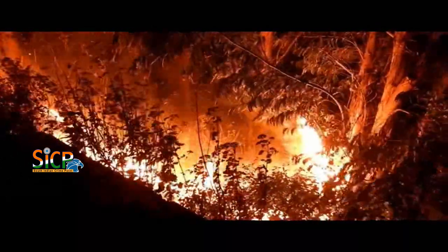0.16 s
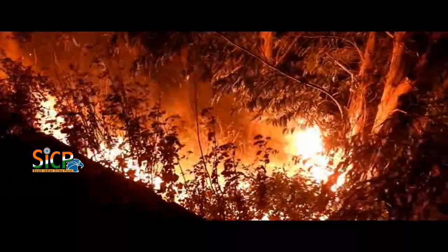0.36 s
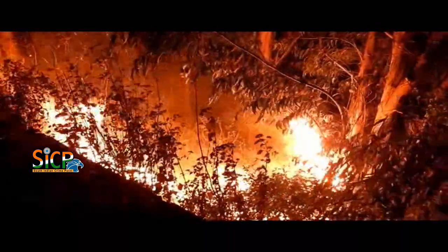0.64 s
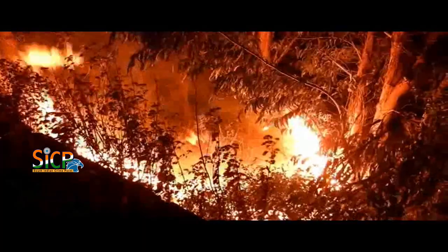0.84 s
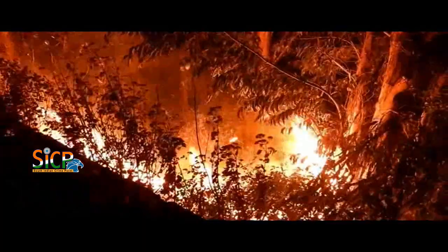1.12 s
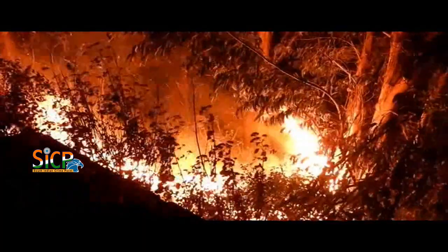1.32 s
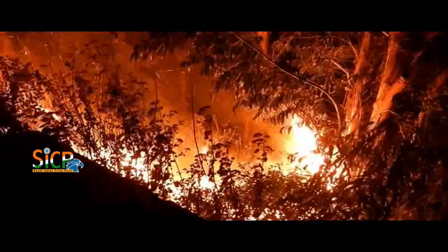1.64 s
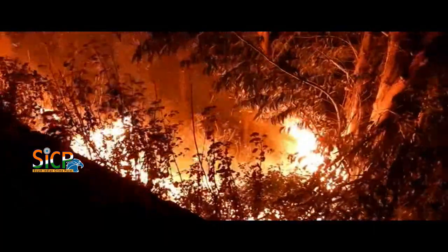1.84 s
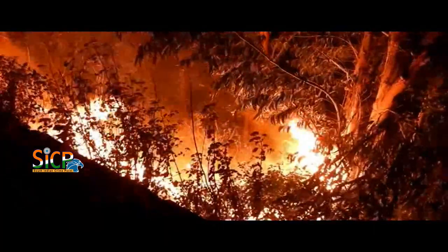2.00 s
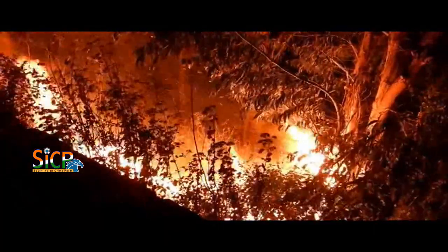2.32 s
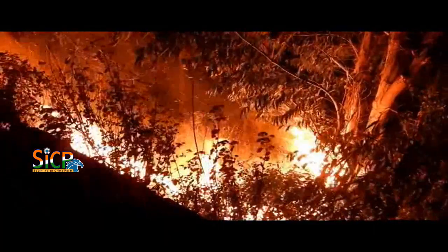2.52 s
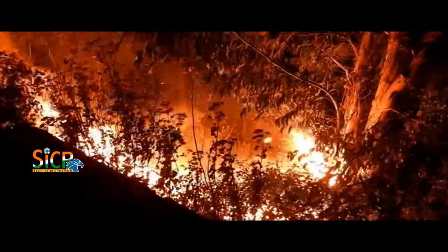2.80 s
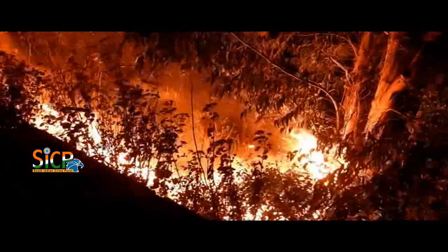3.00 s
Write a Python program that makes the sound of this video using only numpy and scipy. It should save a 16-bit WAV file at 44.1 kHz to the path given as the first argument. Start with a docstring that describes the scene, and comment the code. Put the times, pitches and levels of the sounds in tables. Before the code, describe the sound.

Dense, bright wildfire crackle in stereo, surging as clumps of leaves catch, with dry snaps and hard wood pops; underneath, low rumbling air and gusts knock the microphone, strongest in the first second or so.

```python
"""Countless leaves and twigs sizzle and crackle in a wildfire, and now and then wood bursts with a sharp pop.
Shaped noise makes the sizzle, random clicks the crackle, and short noisy cracks through resonances the pops.
Decaying noise scatters the snaps among undergrowth and trunks. Low noise is the draught, which rumbles
and buffets the microphone; gliding noise bands are tongues of flame. The recorder's treble lags slightly."""
import sys
import numpy as np
from scipy import signal
from scipy.fft import rfft, irfft
from scipy.io import wavfile
from scipy.ndimage import uniform_filter1d

SR = 44100
rng = np.random.default_rng(int(sys.argv[2]) if len(sys.argv) > 2 else 0)


def store_wav(level_fs):
    """Save 16-bit WAV to argv[1]."""
    pcm = np.round(np.clip(np.atleast_2d(level_fs), -1, 1) * 32767)
    wavfile.write(sys.argv[1], SR, pcm.T.astype(np.int16))


N = 138915
TIME = np.arange(N) / SR

# strength of the fire's draught: t/s, level/dB before each layer's trim
DRAUGHT_LEVEL = [(0, -12.5), (.06, -22), (.5, -20), (.8, -23.5), (1.28, -20.5), (1.87, -23), (1.94, -25),
                 (2.22, -22.5), (2.55, -25), (2.9, -18), (3.14, -25)]
# treble colour of snapping wood and leaves: f/Hz, level/dB before scaling to unit energy
SNAP_SPECTRUM = [(300, -42), (1200, -15), (3500, -16.5), (5000, -1), (7000, -3.5), (9000, 3.5), (10500, -8),
                 (12500, -31), (16000, -76)]

# positive pans lean left, negative pans lean right
AIR_PAN_DB, SNAP_PAN_DB = -11.5, 3.5
EDDY_S = 0.0063  # time scale of the small eddies


def amp(db):
    """Turns decibels into a linear gain."""
    return 10 ** (np.asarray(db) / 20)


def evened(x):
    """Scales to unit rms."""
    return x / np.sqrt(np.mean(x ** 2) + 1e-20)


def read(points, hz):
    """Reads a spectrum on a log-frequency axis."""
    f, value = np.transpose(points)
    return np.interp(np.log(hz + 1), np.log(f + 1), value)


def level(curve):
    """Gain over time from a (s, dB) curve."""
    return amp(np.interp(TIME, *np.transpose(curve)))


def swell(s, width):
    """A smooth rise and fall around time s."""
    return np.exp(-.5 * ((TIME - s) / width) ** 2)


def pan(db):
    """Left and right gains of constant power; db is left against right."""
    return evened(amp(np.array([[db], [-db]]) / 2))


def add(mix, s, sound):
    """Mixes a sound in at time s."""
    part = mix[:, round(s * SR):][:, :sound.shape[-1]]
    part += sound[..., :part.shape[1]]


def causal(gain_db, size=2048):
    """The sharpest (minimum-phase) click that has this spectrum, with unit energy."""
    mirrored = np.r_[gain_db, gain_db[-2:0:-1]]
    log_gain = mirrored * np.log(10) / 20
    minimum_phase = np.exp(np.conj(signal.hilbert(log_gain)))
    click = np.fft.ifft(minimum_phase).real[:size // 2]
    return click / np.linalg.norm(click)


def wobble(seconds):
    """Smooth random motion of unit rms, drawn apart for each channel."""
    hz = np.fft.rfftfreq(N, 1 / SR)
    lowpass = np.exp(-(hz * seconds) ** 2)
    return evened(irfft(rfft(rng.standard_normal((2, N))) * lowpass, N))


def steadied(x, size=1500):
    """Takes the slow chance swings out of a noise and keeps its fast grain."""
    power = uniform_filter1d(uniform_filter1d((x ** 2).mean(0), size), size)
    return x / np.sqrt(abs(power) + 1e-12)


def noise(spectrum, likeness, patch_db, size):
    """Stereo noise of a given colour, with patches that drift in time and frequency."""
    hz = np.fft.rfftfreq(size, 1 / SR)
    hop = size // 4
    a, b, c, d, patches = rng.standard_normal((N // hop + 5, len(hz), 5)).T
    patches = uniform_filter1d(patches, size=7, axis=0)
    patches = evened(uniform_filter1d(patches, size=8, axis=1))
    same = 0 if likeness is None else np.clip(read(likeness, hz), -1, 1)[:, None]
    left = a + 1j * b
    right = same * left + np.sqrt(1 - same ** 2) * (c + 1j * d)
    gain = amp(read(spectrum, hz)[:, None] + patch_db * patches)
    sound = signal.istft(np.array([left, right]) * gain, nperseg=size, noverlap=size - hop)[1]
    return evened(sound[:, :N])


def forest(x):
    """Adds quick scatter from the undergrowth and a thin tail from the trunks, as decaying noise."""
    t = TIME[:SR // 2]
    undergrowth = (-6.5, 0.02, .6)  # level/dB, time to fall 60 dB/s, share unlike on the two sides
    trunks = (-5.5, 0.053, .7)
    out = x.copy()
    for db, t60, apart in (undergrowth, trunks):
        tail = rng.standard_normal(len(t)) + apart * rng.standard_normal((2, len(t)))
        tail = tail * amp(-60 * t / t60) * (t > .0007)
        tail /= np.linalg.norm(tail[0])
        out += amp(db) * signal.fftconvolve(x, tail, axes=1)[:, :x.shape[1]]
    return out


def rumble():
    """The draught rumbles in uneven puffs, its noise unrelated on the two sides."""
    # colour of the rumble: f/Hz, level/dB before scaling to unit rms
    rumble_spectrum = [(30, -16), (60, -5.5), (95, 1), (180, -0.5), (250, -13), (400, -21.5), (700, -38),
                       (1200, -45.5), (3000, -72)]
    trim_db, pan_db, patch_db = 4.5, -3.5, 2.5
    buffet_db, buffet_s = 3.5, 0.018
    air = noise(rumble_spectrum, None, patch_db, size=2048)
    air = steadied(air * amp(buffet_db * wobble(buffet_s)[0]), size=5000)
    return amp(trim_db) * level(DRAUGHT_LEVEL) * pan(pan_db) * air


def gusts():
    """Each gust is a low push on both sides and a brighter flutter of eddies, mostly right, that never quite stops."""
    # gusts breaking up on the microphone: peak t/s, half width/s, push level/dB, flutter level/dB before trim
    gust_events = [(0.14, 0.031, -12, -26), (0.362, 0.036, -15.5, -23.5), (.53, 0.036, -23.5, -33.5),
                   (0.65, 0.022, -13.5, -53), (0.875, 0.034, -20.5, -26), (1.04, 0.0042, -8.5, -25),
                   (1.16, 0.057, -17.5, -20.5), (1.227, 0.014, -14.5, -23), (1.606, 0.036, -19.5, -28.5),
                   (1.779, 0.058, -26.5, -31.5), (2.347, 0.0084, -18, -31), (2.72, 0.016, -21, -48),
                   (2.869, 0.04, -15, -34), (3.092, 0.077, -14, -27.5)]
    # colour of the push: f/Hz, level/dB before levelling
    push_spectrum = [(40, -8), (100, 1), (180, -3), (300, -11), (500, -33.5), (1000, -70), (3000, -73)]
    # colour of the flutter: f/Hz, level/dB before levelling
    flutter_spectrum = [(100, -12.5), (300, 5), (500, 3.5), (800, -10), (1150, -29.5), (1700, -28.5),
                        (4000, -55)]
    patch_db, flutter_pan_db, eddy_db = 4.5, -7, 7
    flutter_trim_db = -1
    steady_flutter_db = -15  # between the gusts, against the draught
    push = steadied(noise(push_spectrum, None, patch_db, size=1024), size=900)
    flutter = noise(flutter_spectrum, None, patch_db, size=512)
    flutter = steadied(flutter * amp(eddy_db * wobble(EDDY_S)), size=1500)
    flutter = pan(flutter_pan_db) * flutter
    out = amp(steady_flutter_db) * level(DRAUGHT_LEVEL) * flutter
    for s, width, push_db, flutter_db in gust_events:
        gust = amp(push_db) * push + amp(flutter_db + flutter_trim_db) * flutter
        out += swell(s, width) * gust
    return out


def knocks():
    """A single eddy hits the microphone: a damped low push with a ragged wake, brighter the smaller the eddy."""
    # single eddies: t/s, peak level/dB before panning, top of the spectrum f/Hz
    knock_events = [(0.2031, -5.5, 780), (.211, -3, 304), (1.101, -5.5, 376), (2.068, -6.5, 170),
                    (2.155, -7.5, 540)]
    centre_hz, width_hz = 125, 210
    wake_db = -24.5  # ragged air behind each knock
    out = np.zeros((2, N))
    hz = np.fft.rfftfreq(4096, 1 / SR) + 1
    for s, db, top_hz in knock_events:
        detuning = (hz ** 2 - centre_hz ** 2) / (hz * width_hz)
        loss = (1 + detuning ** 2) * (1 + (hz / top_hz) ** 8)
        push = causal(np.maximum(-10 * np.log10(loss), -100), size=4096)
        t = TIME[:len(push)]
        wake = amp(wake_db) * rng.standard_normal(len(t)) * np.exp(-t / EDDY_S)
        push = signal.fftconvolve((t == 0) + wake, push)
        add(out, s, pan(AIR_PAN_DB) * amp(db) * push / abs(push).max())
    return out


def whooshes():
    """A tongue of flame roars in one broad, gliding resonance."""
    # tongues of flame: peak t/s, half width/s, level/dB, pitch at the peak f/Hz, glide/(Hz per s)
    flame_tongues = [(.35, 0.014, -36, 940, -2000), (.868, 0.011, -34, 665, 5000),
                     (1.18, 0.037, -30.5, 830, -1800)]
    width_hz = 320
    out = np.zeros((2, N))
    band = signal.butter(2, width_hz / 2, fs=SR, output="sos")
    for s, width, db, hz, glide in flame_tongues:
        # shift the noise down, low-pass it, and shift it back up around the gliding pitch
        turn = np.exp(2j * np.pi * np.cumsum(hz + glide * (TIME - s)) / SR)
        roar = (turn * signal.sosfilt(band, rng.standard_normal((2, N)) / turn)).real
        out += amp(db) * swell(s, width) * steadied(pan(AIR_PAN_DB) * roar)
    return out


def crackle(kinds=24):
    """Twigs and leaves snap at random: many faint, a few strong, each kind with its own colour and place."""
    # average colour of the clicks: f/Hz, level/dB before scaling to unit energy
    crackle_spectrum = [(400, -43), (1200, -5.5), (1900, -7), (2450, -4), (3500, -7.5), (5000, -2),
                        (7000, -2.5), (9000, 0), (10500, -18), (12500, -50), (16000, -56)]
    trim_db, clicks_per_s, pan_spread_db = -1, 900, 7.5
    spread_db, strength_cap, colour_db = 8.5, 3.14, 8
    out = np.zeros((2, N))
    hz = np.fft.rfftfreq(2048, 1 / SR)
    for _ in range(kinds):
        chance = rng.random(N)
        strength = np.minimum(rng.exponential(1, N), strength_cap)
        clicks = (chance < clicks_per_s / kinds / SR) * amp(spread_db * strength)
        colour = evened(uniform_filter1d(rng.standard_normal(len(hz)), size=50))
        click = causal(read(crackle_spectrum, hz) + colour_db * colour)
        place = pan(pan_spread_db * rng.standard_normal())
        click = forest(place * np.pad(click, (0, SR // 10)))
        out += signal.oaconvolve(clicks[None], click, axes=1)[:, :N]
    return amp(trim_db) * evened(out)


def foliage():
    """Near crackles over the fused sizzle of the fire front; both surge when a clump of leaves catches."""
    # level of sizzle and crackle: t/s, level/dB before their trims;
    # at 0.2 s a wind buffet overloads the microphone and chokes them
    foliage_level = [(0, -33), (.09, -36), (.203, -50), (.225, -34.5), (.32, -43), (.45, -36.5),
                     (.6, -38.5), (1.02, -40.5), (1.2, -36.5), (1.275, -45.5), (1.4, -38.5), (1.52, -44),
                     (1.62, -40), (2.49, -40), (2.65, -37.5), (3.14, -35)]
    # clumps of leaves flaring up: peak t/s, half width/s, level/dB before the same trims
    flare_events = [(.148, 0.031, -31), (0.367, 0.015, -36.5), (.44, 0.058, -37.5), (.7, 0.049, -39.5),
                    (0.864, 0.044, -37.5), (1.171, 0.0088, -30.5), (1.595, 0.012, -34),
                    (1.84, 0.025, -43.5), (2.122, 0.012, -36.5), (2.308, 0.02, -39.5),
                    (2.594, 0.027, -31.5), (2.717, 0.014, -31.5), (2.96, 0.066, -47), (3.1, 0.054, -49)]
    # colour of the sizzle: f/Hz, level/dB before scaling to unit rms
    sizzle_spectrum = [(500, -46), (1200, -16.5), (1900, -9), (2450, -11), (3600, -11.5), (4700, -9.5),
                       (7500, -5), (8800, 1.5), (9600, -2), (10800, -12), (14000, -29.5), (16000, -62)]
    # likeness of the two sides: f/Hz, left-right correlation/1
    side_likeness = [(500, 1), (2000, 0.6), (4000, 0.76), (7000, 0.57), (10000, 0.26), (15000, .1)]
    sizzle_db, patch_db, pan_db = 2.1, 3.5, 0.5
    flare_power = sum((amp(db) * swell(s, width)) ** 2 for s, width, db in flare_events)
    gain = np.sqrt(level(foliage_level) ** 2 + flare_power)
    sizzle = amp(sizzle_db) * noise(sizzle_spectrum, side_likeness, patch_db, size=256)
    return gain * pan(pan_db) * (sizzle + crackle())


def leaves():
    """Dry leaves close by burst with a thin snap and no ring of wood."""
    # dry leaves snapping: t/s, level/dB of the tearing noise at its start, before colour and scatter
    leaf_events = [(.181, -20), (.818, -22.5), (1.152, -24), (2.397, -26), (2.752, -23), (2.9327, -17)]
    tear_s = 0.0017
    out, t = np.zeros((2, N)), TIME[:SR // 5]
    snap = causal(read(SNAP_SPECTRUM, np.fft.rfftfreq(2048, 1 / SR)))
    for s, db in leaf_events:
        tear = rng.standard_normal(len(t)) * np.exp(-t / tear_s)
        crack = signal.fftconvolve(tear, snap)[:len(t)]
        add(out, s, forest(pan(SNAP_PAN_DB) * amp(db) * crack))
    return out


def pops():
    """Each pop is one crack and a short spray of splinters, ringing in the wood and snapping in the treble."""
    # bursting wood: t/s, body level/dB, snap level/dB before trim, body pitch f/Hz, splitting time/s
    wood_bursts = [(0.0574, -26.5, -35, 2400, 0.0035), (0.0949, -13.5, -9, 2330, 0.0012),
                   (0.2195, -28, -21, 2140, 0.0037), (.353, -24.5, -16, 1400, 0.002),
                   (0.3623, -16, -38, 2600, 0.00049), (0.4108, -8, -16, 2140, 0.00018),
                   (0.667, -17.5, -14.5, 2340, 0.0011), (0.73, -18, -12, 2340, 0.0017),
                   (0.903, -26, -10.5, 2480, 0.00057), (1.0912, -24.5, -15.5, 3100, 0.0012),
                   (1.3403, -20, -9, 1450, 0.0012), (1.6014, -22, -36, 2410, 0.00063),
                   (1.825, -22.5, -19, 2410, 0.00039), (2.4065, -28, -18, 1620, 0.0014),
                   (2.456, -33, -16.5, 2190, 0.00074), (2.5, -22, -29, 2350, 0.001),
                   (2.5048, -27.5, -18, 2560, 0.0019), (2.5724, -21.5, -7, 2660, 0.00039),
                   (2.699, -27.5, -17.5, 2230, 0.0011), (2.8139, -20.5, -28, 2280, 0.00044),
                   (2.8979, -22, -14, 2480, 0.0041), (2.9844, -19.5, -16.5, 2520, 0.0054),
                   (2.9836, -14, -4, 980, 0.0015)]
    # thin twigs cracking: t/s, level/dB of body and of snap before trim
    twig_cracks = [(.8835, -33), (1.9208, -24.5), (2.216, -31), (2.862, -22.5), (3.0532, -25.5),
                   (3.1326, -28.5)]
    twig_hz, twig_split_s = 2600, 0.00079  # all twigs are of one size
    body_width_hz, body_low_hz, body_high_hz = 1090, 830, 5930  # the ring carries only from low to high
    body_pan_db, snap_trim_db = -3, -4.5
    body_spray_db, snap_spray_db = -11, 2  # splinters against the first crack
    out, t = np.zeros((2, N)), TIME[:SR // 5]
    hz = np.fft.rfftfreq(2048, 1 / SR)
    snap = causal(read(SNAP_SPECTRUM, hz))
    rolloff = 1 + (body_low_hz / (hz + 1)) ** 6 + (hz / body_high_hz) ** 8
    twigs = [(s, db, db, twig_hz, twig_split_s) for s, db in twig_cracks]
    for s, body_db, snap_db, pitch, split_s in list(wood_bursts) + twigs:
        detuning = (hz ** 2 - pitch ** 2) / ((hz + 1) * body_width_hz)
        body = causal(np.maximum(-10 * np.log10((1 + detuning ** 2) * rolloff), -100))
        layers = ((body, body_db, body_spray_db, body_pan_db),
                  (snap, snap_db + snap_trim_db, snap_spray_db, SNAP_PAN_DB))
        sound = np.zeros((2, len(t)))
        for ring, db, spray_db, side_db in layers:
            spray = rng.standard_normal(len(t)) * np.exp(-t / split_s) / np.sqrt(SR / 2000)
            crack = signal.fftconvolve((t == 0) + amp(spray_db) * spray, ring)[:len(t)]
            # slower splitting carries more energy
            crack = crack / np.linalg.norm(crack) * np.sqrt(split_s * SR / 2)
            sound += pan(side_db) * amp(db) * crack
        add(out, s, forest(sound))
    return out


def scene():
    """The fire, reaching the left side a little earlier, and the moving air."""
    right_lag_s = .000007
    fire = foliage() + pops() + leaves()
    hz = np.fft.rfftfreq(N, 1 / SR)
    fire[1] = irfft(rfft(fire[1]) * np.exp(-2j * np.pi * hz * right_lag_s), N)
    return fire + whooshes() + rumble() + gusts() + knocks()


def record(dry):
    """A low cut; the treble comes out a little later than the rest; then full-scale clipping and the band limit."""
    low_cut_hz, split_hz, edge_hz = 58, 4100, 15700
    treble_lag_s = .0106
    x = signal.sosfilt(signal.butter(2, low_cut_hz, "high", fs=SR, output="sos"), dry)
    low = signal.oaconvolve(x, signal.firwin(301, split_hz, fs=SR)[None], "same")
    treble = np.roll(x - low, round(treble_lag_s * SR), axis=1)  # the end wraps to the start
    out = np.clip(low + treble, -1, 1)
    band_limit = signal.firwin(511, edge_hz, window=("kaiser", 9), fs=SR)
    return signal.oaconvolve(out, band_limit[None], "same")


dry = scene()
out = record(dry)
store_wav(out)
```